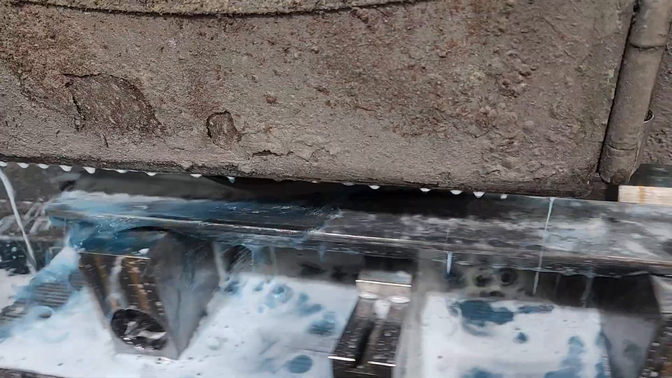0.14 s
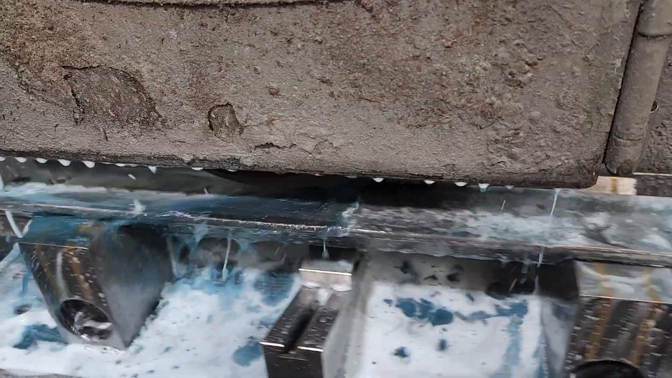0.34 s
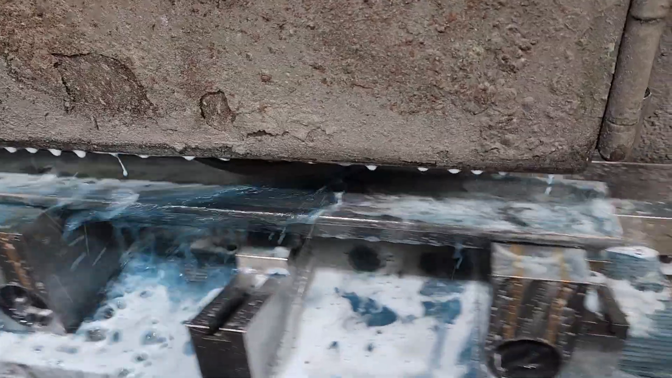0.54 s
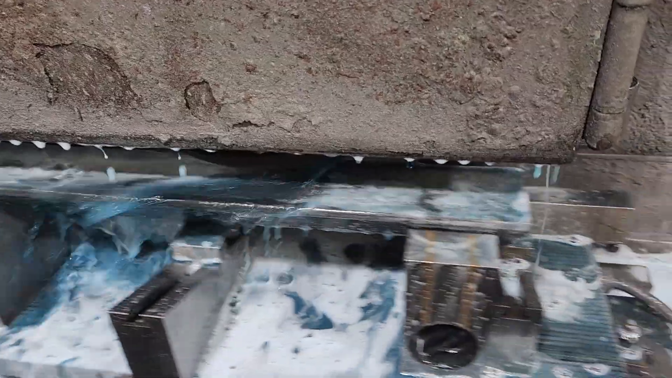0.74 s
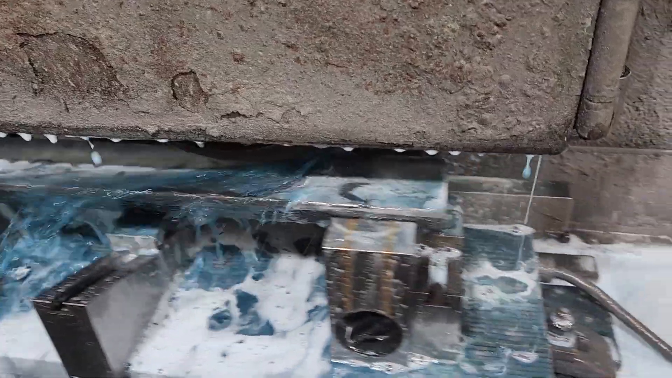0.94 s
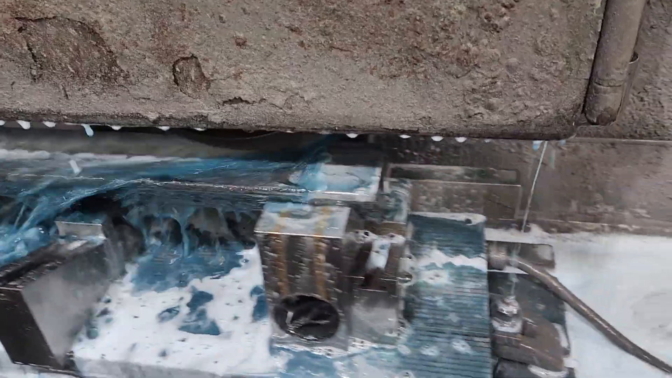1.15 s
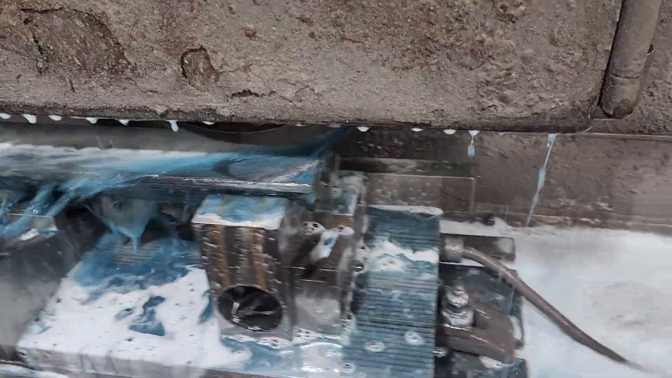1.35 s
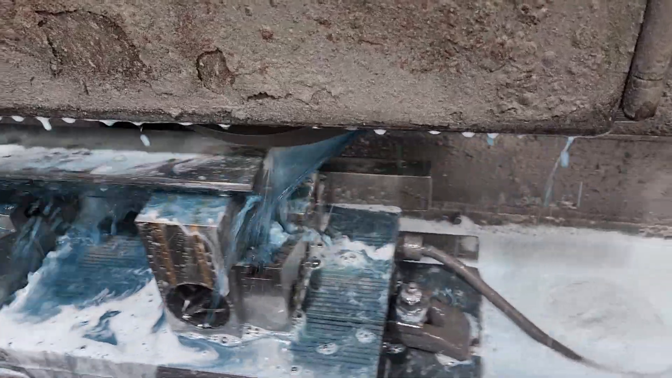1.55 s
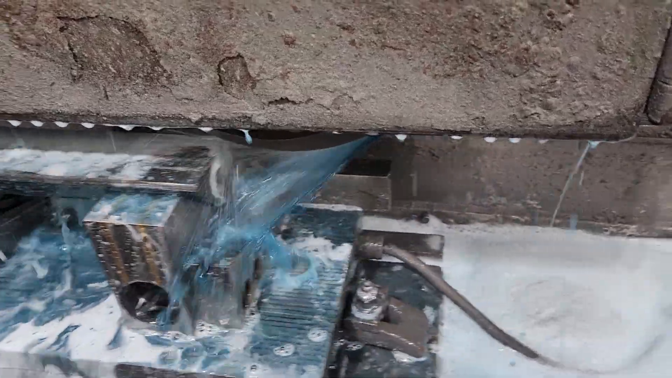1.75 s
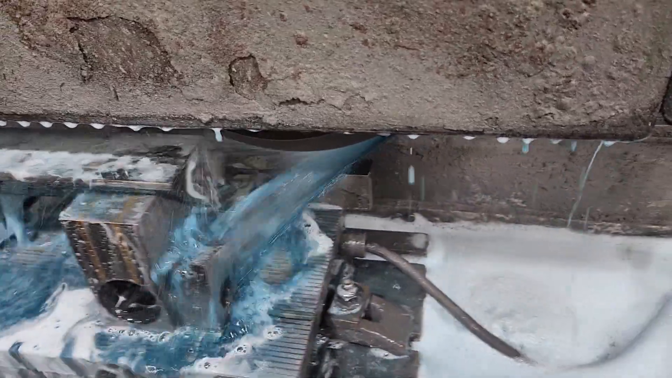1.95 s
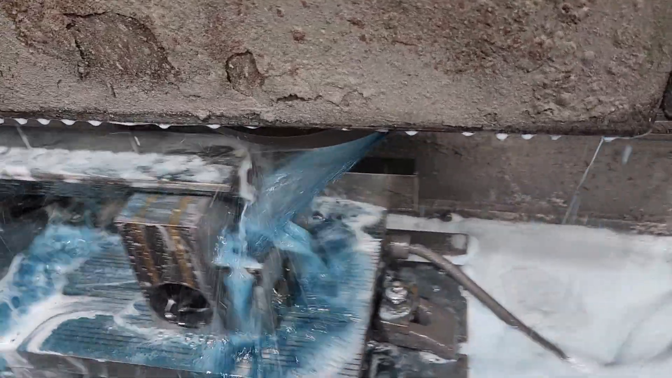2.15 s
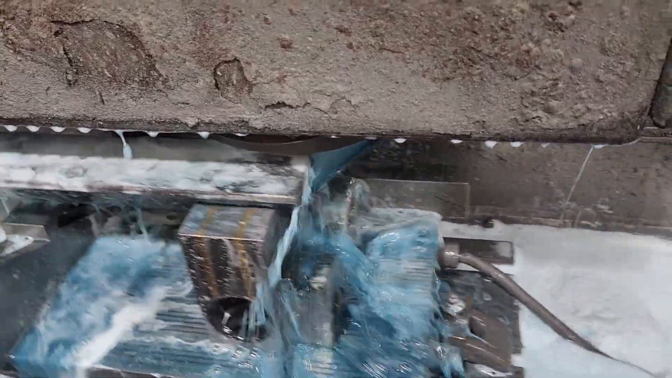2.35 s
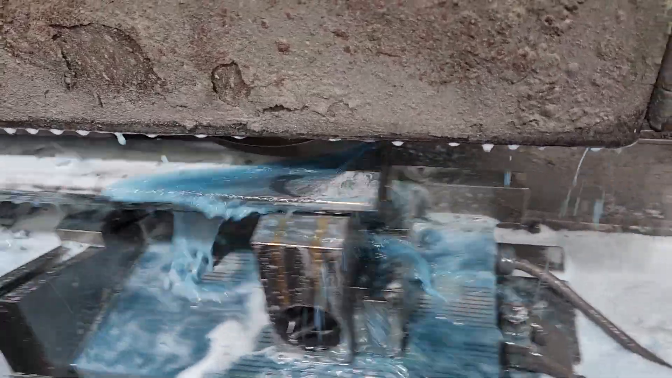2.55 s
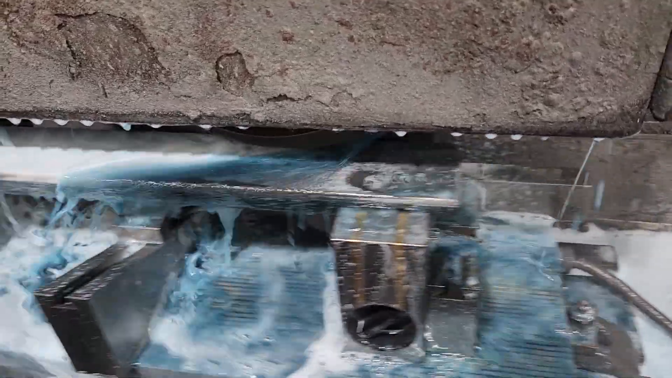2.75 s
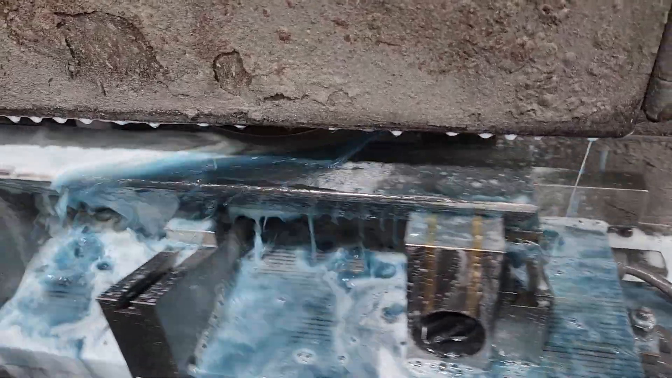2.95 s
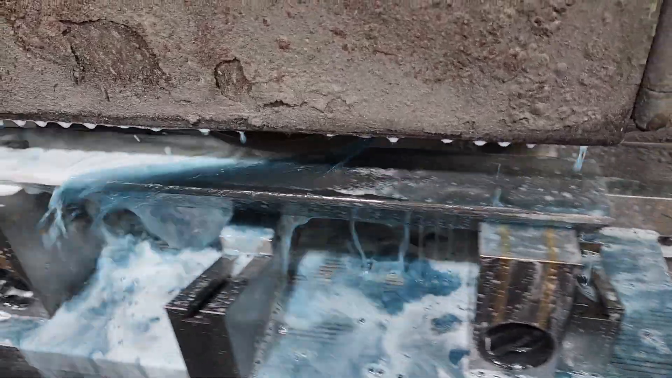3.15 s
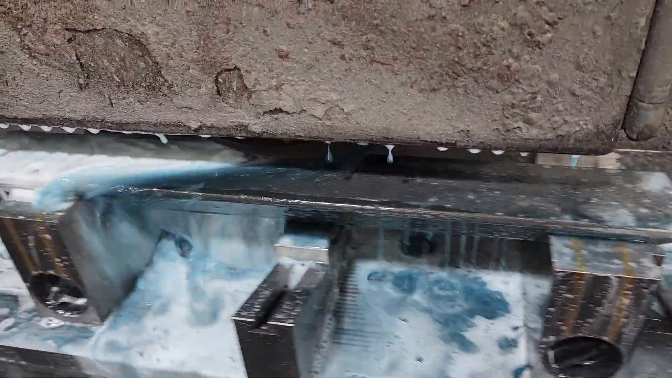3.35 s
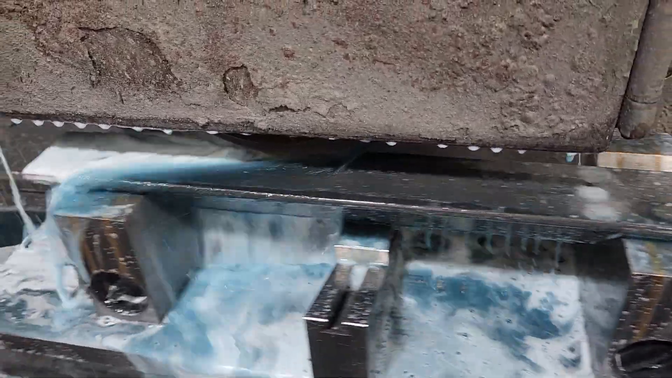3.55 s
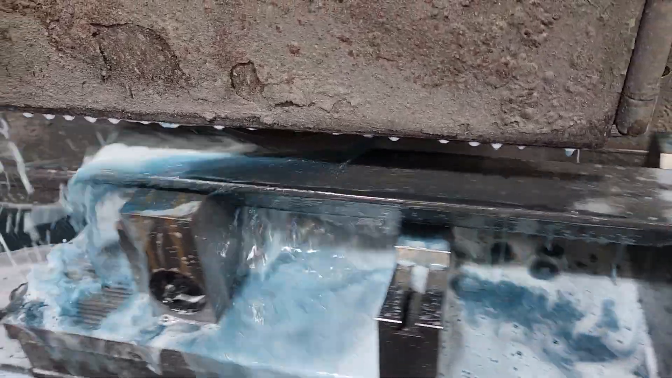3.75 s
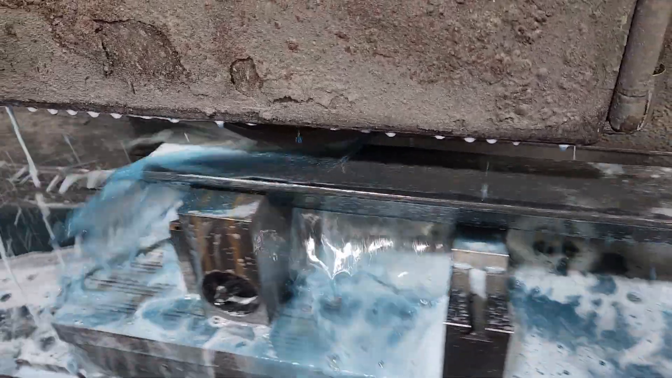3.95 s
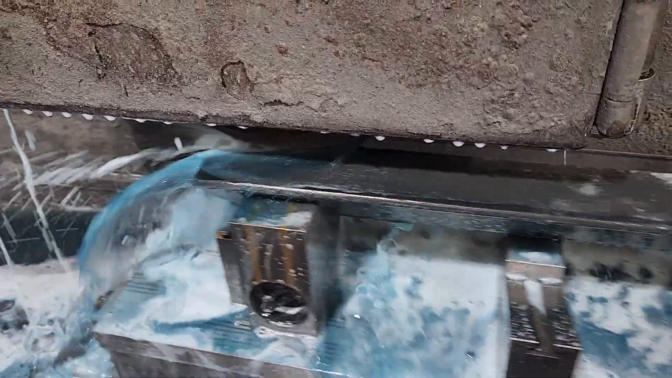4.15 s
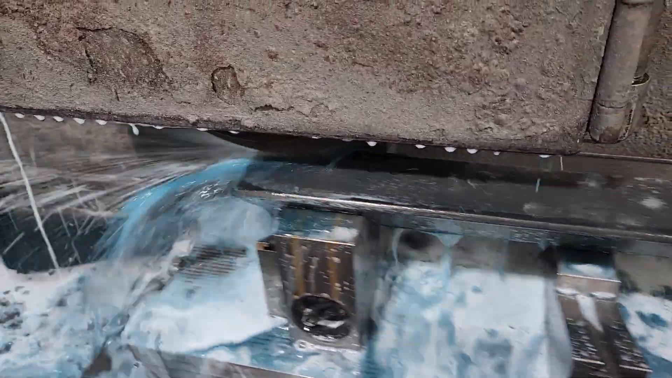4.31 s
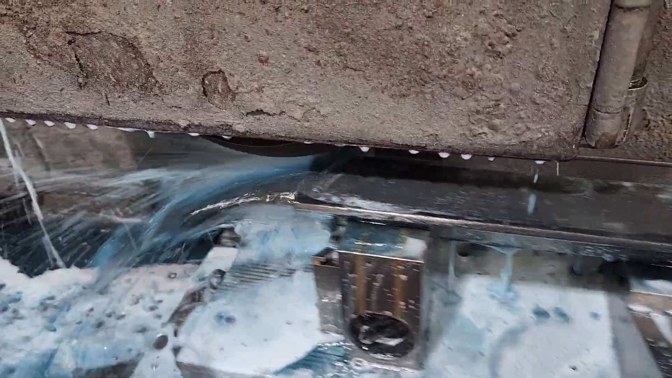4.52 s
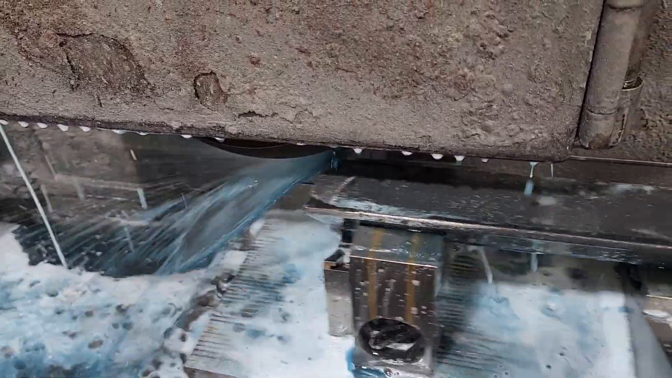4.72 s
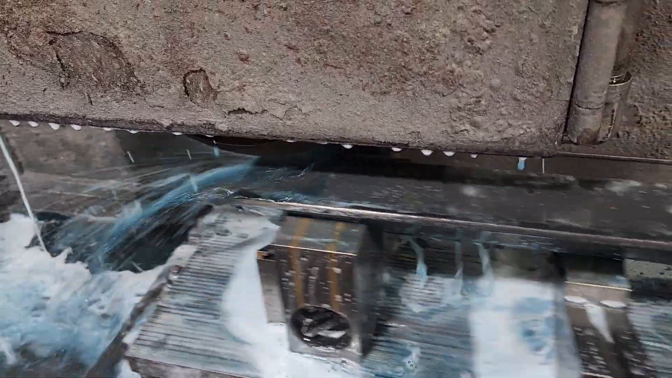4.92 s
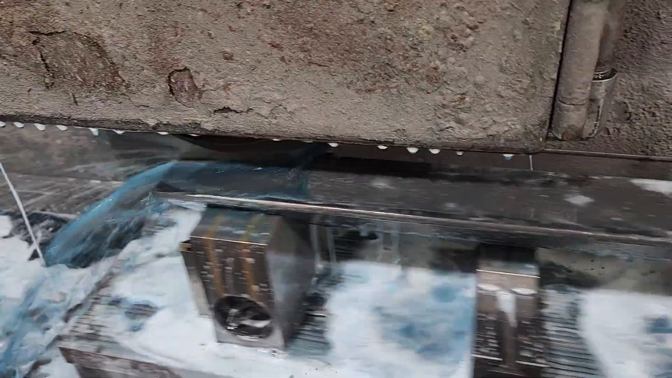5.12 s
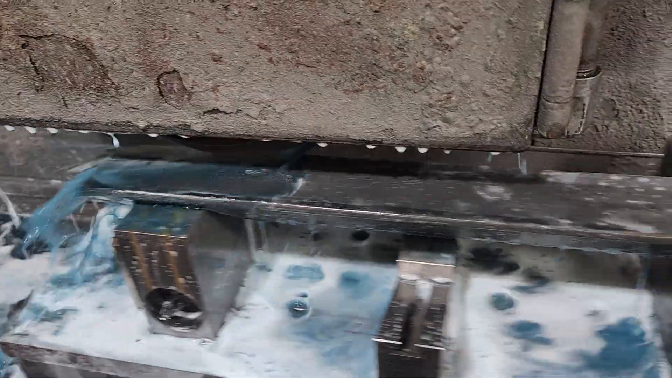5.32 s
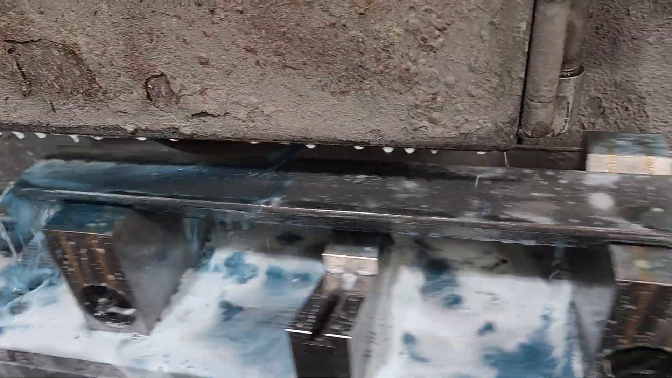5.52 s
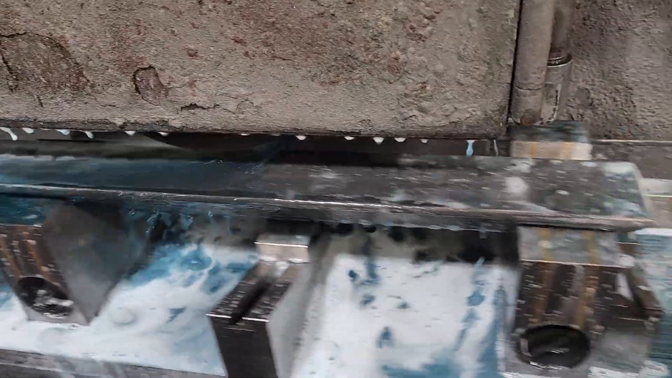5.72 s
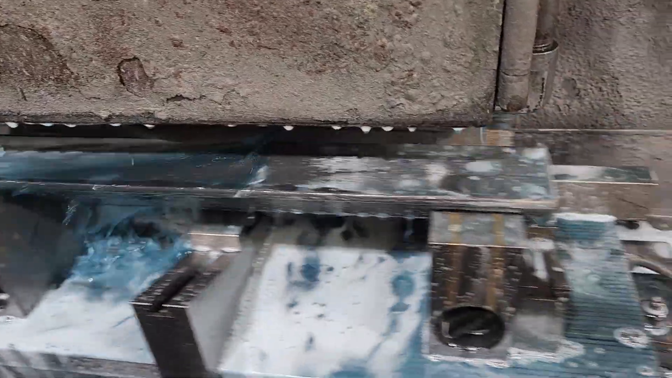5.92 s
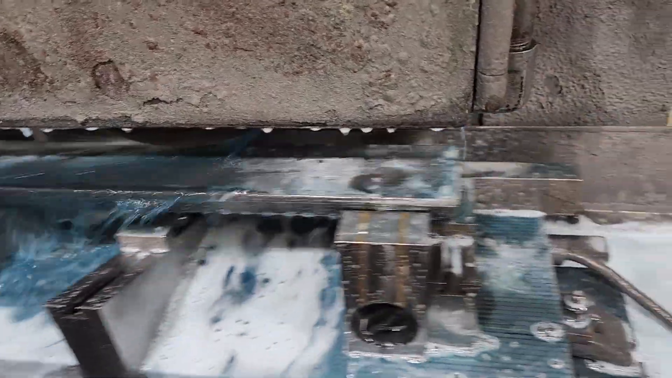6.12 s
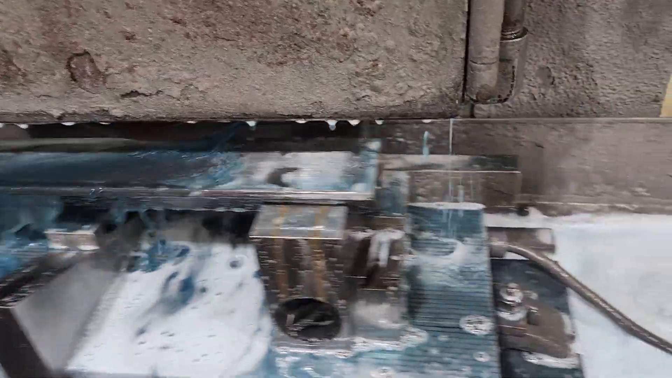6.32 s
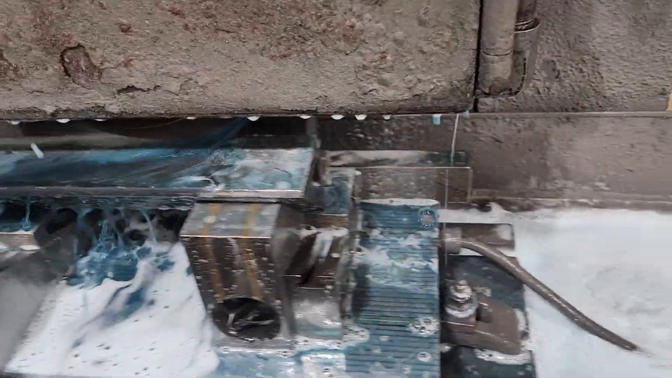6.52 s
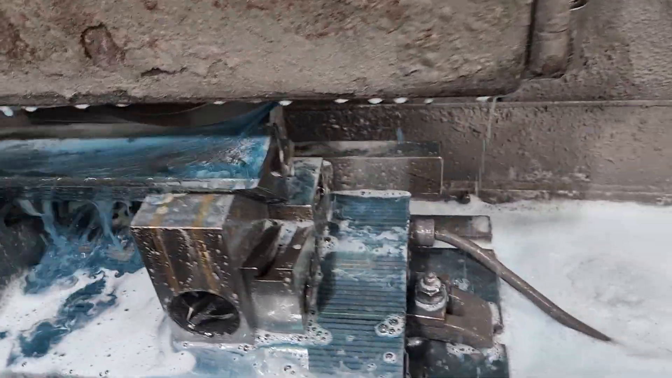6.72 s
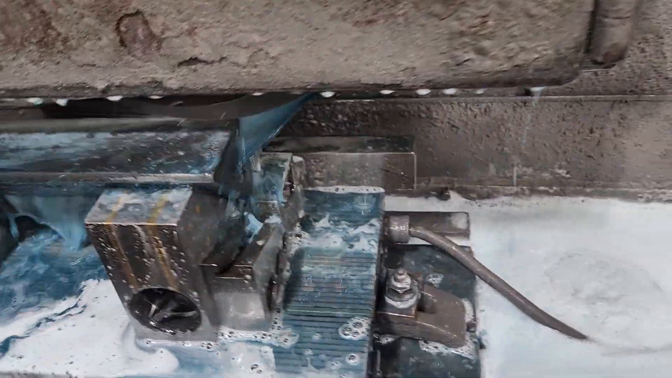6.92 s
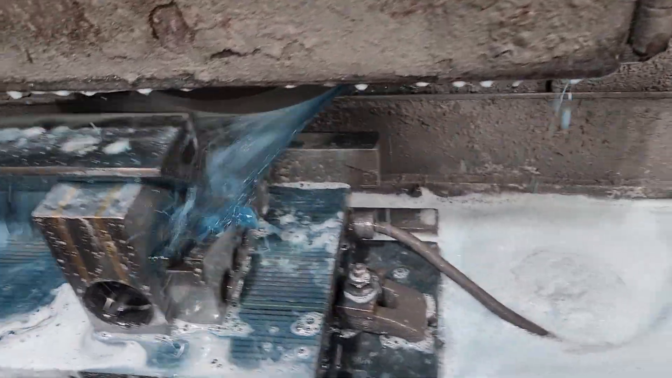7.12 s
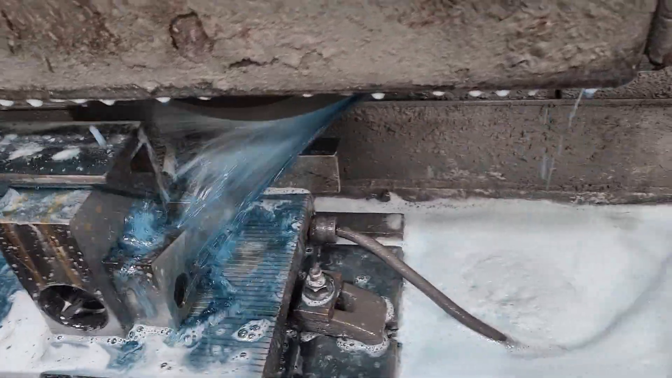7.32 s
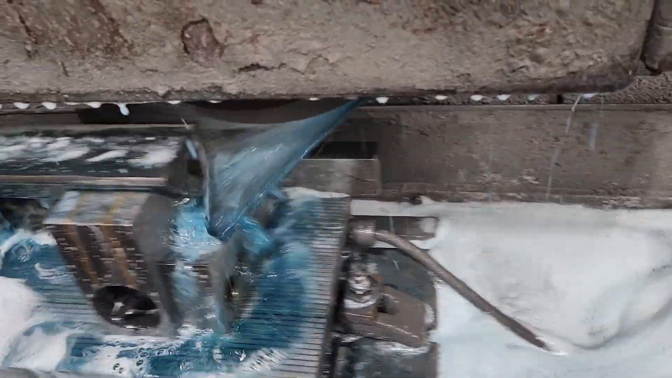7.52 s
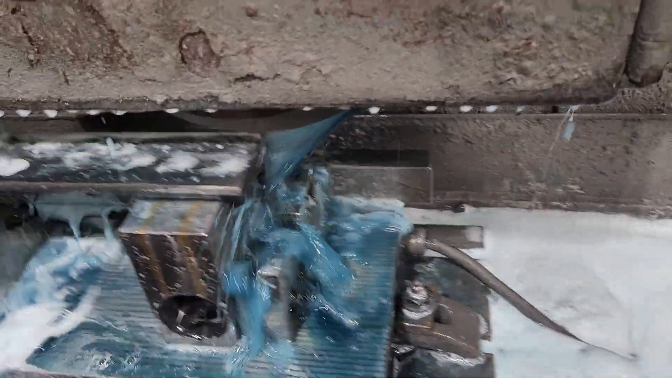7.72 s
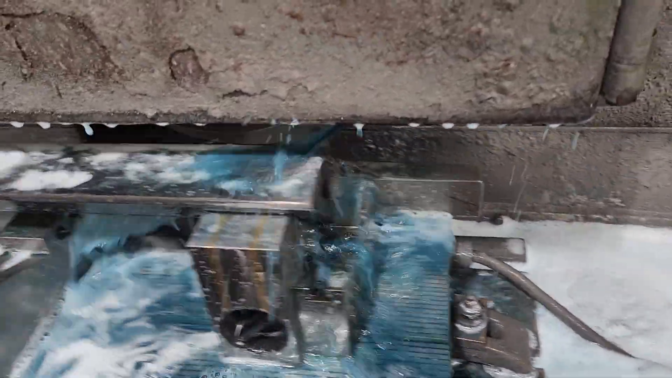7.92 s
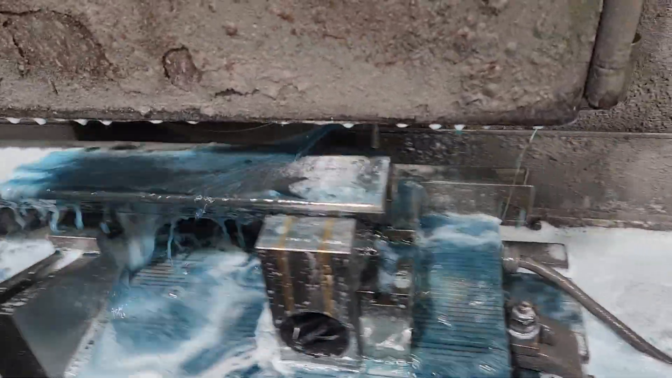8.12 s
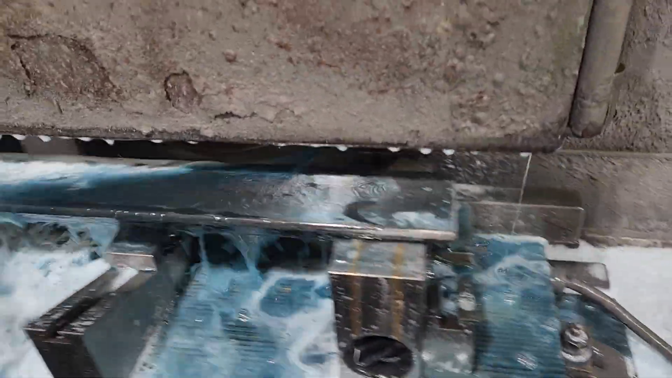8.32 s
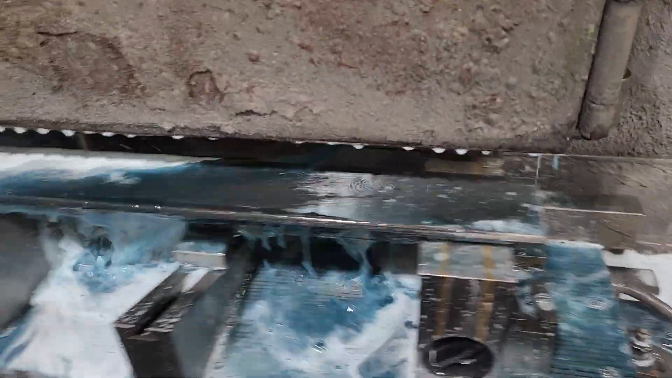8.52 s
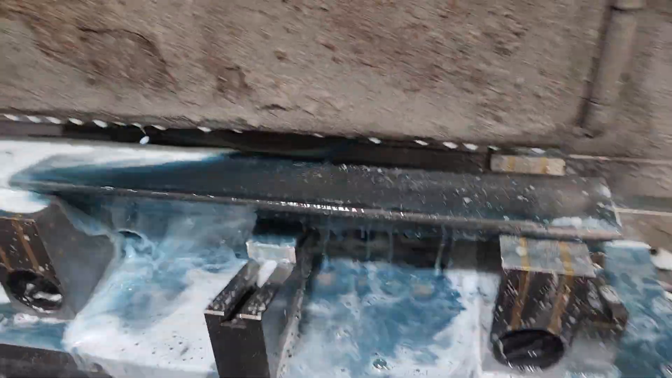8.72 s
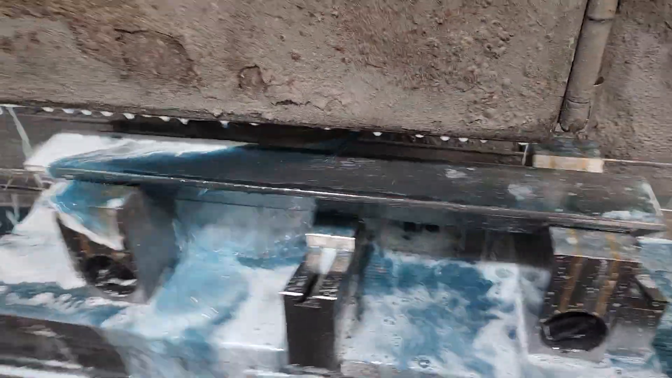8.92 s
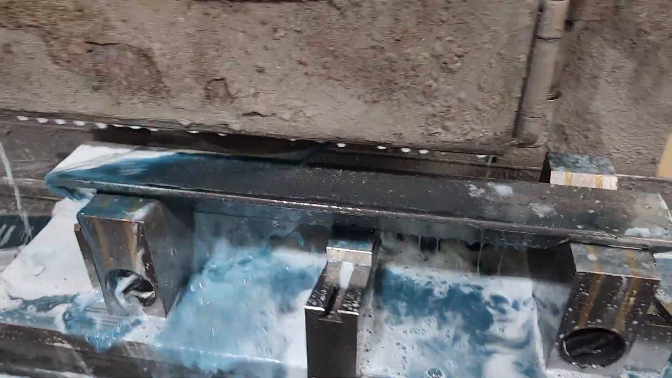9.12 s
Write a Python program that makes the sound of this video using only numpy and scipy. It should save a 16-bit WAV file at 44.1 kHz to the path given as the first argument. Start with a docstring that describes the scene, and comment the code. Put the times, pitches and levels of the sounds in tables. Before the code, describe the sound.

A surface grinder drones with a loud wavering pump whine while coolant rushes and spatters, the table knocks at its reversals and the wheel rasps briefly on steel.

```python
"""A workshop, close to a surface grinder, on two microphone ports. Motors hum and rumble at the back; the hydraulic
pump is a set of whining tones whose levels follow the table's travel. The wheel's coolant is coloured noise that
churns, rushes and spatters; the wheel twice bites the steel, repeating noise ringing through resonances.
The table drive knocks, at its reversals among other moments: clicks and rattles striking decaying modes."""
import sys
import numpy as np
from scipy import signal
from scipy.fft import rfft, irfft, next_fast_len
from scipy.io import wavfile

SR = 44100
rng = np.random.default_rng(int(sys.argv[2]) if len(sys.argv) > 2 else 0)


def file_out(sig):
    """Save sig as 16-bit WAV at sys.argv[1]."""
    # one column per channel
    cols = np.atleast_2d(sig).T
    # limit, then scale
    lim = np.clip(cols, -1, 1)
    pcm = np.round(lim * 32767).astype(np.int16)
    wavfile.write(sys.argv[1], SR, pcm)


N = 403940   # samples

WHEEL_TURNS_HZ = 29.96
# the wheel bites on the way in and again on the way out of one turn, at the same stretch of the work
BITE_TURN_S = 2.018   # middle of that turn
EDGE_S, EDGE_RISE_S = 0.33, 0.051   # travel from the turn to the edge of the work, and time to pass it
# the valve turns the table round at the near end, far end, near end: reversal_s
REVERSALS_S = [1.97, 4.72, 7.397]


def from_db(db):
    """Decibels to gain."""
    return 10 ** (np.asarray(db) / 20)


def rms_one(x):
    """Scales to unit rms."""
    return x / np.sqrt(np.mean(x ** 2) + 1e-20)


def in_time(rows):
    """Columns of a table, joined by straight lines, one value a sample."""
    s, *columns = np.transpose(rows)
    return [np.interp(np.arange(N) / SR, s, c) for c in columns]


def in_cycle(rows):
    """Repeats a table on every trip of the machine's table out and back."""
    trip_s = REVERSALS_S[2] - REVERSALS_S[0]
    return np.array([(REVERSALS_S[0] + k * trip_s + s, *rest) for k in (-1, 0, 1) for s, *rest in rows])


def on_work():
    """Travel time from the biting turn, and 0-1 for the wheel being past the edge of the work."""
    away_s = abs(np.arange(N) / SR - BITE_TURN_S)
    return away_s, np.clip((away_s - EDGE_S) / EDGE_RISE_S, 0, 1)


def at_hz(points, hz):
    """Reads a spectrum table on a log-frequency axis."""
    table_hz, values = np.array(points).T
    return np.interp(np.log(hz + 1), np.log(table_hz), values)


def drift(rate_hz):
    """Slow chance of spread 1: coarse noise twice through a one-pole low-pass."""
    coarse = 40   # samples per step
    r = np.exp(-2 * np.pi * rate_hz * coarse / SR)
    noise = rng.standard_normal(N // coarse + 2002)
    slow = signal.lfilter([1], [1, -2 * r, r * r], noise)[2000:]   # settled part
    return np.interp(np.arange(N) / coarse, np.arange(len(slow)), rms_one(slow))


def sine(turns, lead_rad=0.):
    """A tone of rms 1 in both ports, the left one ahead by lead_rad."""
    return np.sqrt(2) * np.sin(2 * np.pi * turns + np.outer([.5, -.5], lead_rad * np.ones(N)))


def per_turn(share):
    """Noise of which a share repeats on every turn of the wheel, slowly renewed; two unrelated rows."""
    size = round(SR / WHEEL_TURNS_HZ)
    fresh = rng.standard_normal((2, N // size + 21, size))
    keep = 0.916   # carried over from one turn to the next
    pattern = signal.lfilter([np.sqrt(1 - keep ** 2)], [1, -keep], fresh, axis=1)
    pattern = pattern[:, 20:].reshape(2, -1)[:, :N]
    share = np.clip(share, 0, 1)
    return np.sqrt(share) * pattern + np.sqrt(1 - share) * rng.standard_normal((2, N))


def coloured(source, spectrum, flicker_db=0., rate_hz=10.):
    """Colours two unrelated rows, mixes them to the ports, flickers half-octave bands; port mean has rms 1."""
    # left-right likeness of the noise: pitch_hz, likeness (-1 to 1)
    likeness = [(60, 0.84), (290, 1), (640, 0.13), (1410, -0.41), (3100, -0.064)]
    # how much louder the left port is: pitch_hz, difference_db
    left_louder = [(700, 4), (1290, -6), (2400, 5.5), (4400, 5.5), (8000, 0.5), (10000, 10.5),
                   (15000, 13.5)]
    size = next_fast_len(N)
    hz = np.arange(size // 2 + 1) * SR / size
    mid, side = rfft(source, size) * from_db(at_hz(spectrum, hz))
    alike = np.clip(at_hz(likeness, hz), -1, 1)
    pan = from_db(np.outer([.5, -.5], at_hz(left_louder, hz)))
    ports = pan * (np.sqrt(1 + alike) * mid + np.sqrt(1 - alike) * side * [[1], [-1]])
    ports /= np.sqrt(np.sum(pan ** 2, axis=0) + 2 * alike)
    out, half_octave = 0, 2 * np.log2(hz + 1)
    first, last = np.ceil(2 * np.log2(spectrum[0][0])), 2 * np.log2(spectrum[-1][0])
    for centre in np.arange(first, last + 1):
        band = irfft(ports * np.clip(1 - abs(half_octave - centre), 0, 1), size)[:, :N]
        out = out + from_db(flicker_db * drift(rate_hz)) * band
    return out / np.std(out.mean(axis=0))


def motors():
    """Steady lines of the spindle and the motors, wavering a little, over a low rumble."""
    # motors, before the swell: pitch_hz, level_db
    motor_lines = [(58.2, -50.5), (119.98, -32.5), (130.46, -44)]
    # wheel unbalance, before the swell: multiple of the turning rate, level_db
    spindle = [(1, -45.5), (3, -44.5), (5, -51), (6, -50.5), (8, -41.5), (9, -49.5), (7, -55.5)]
    # hum lines nearest a multiple sink for a while: multiple of the turning rate, centre_s, half_width_s, change_db
    hum_dips = [(8, 4.34, 0.67, -7.5), (4, 6.8, 0.094, -9.5)]
    # hum and rumble swell and sink together: time_s, change_db
    hum_swell = [(0, 2), (2.7, 2.5), (3.7, 4), (4.7, 3), (4.9, 0.5), (6.8, 2), (7.1, 3.5)]
    # colour of the rumble: pitch_hz, density_db (per Hz, relative)
    rumble_colour = [(25, 0), (45, -12), (100, -6.5), (230, -5.5), (400, -5.5), (600, -46)]
    t = np.arange(N) / SR
    lines = motor_lines + [(m * WHEEL_TURNS_HZ, db) for m, db in spindle]
    hum = 0
    for hz, db in lines:
        dip_db = sum(change_db * np.exp(-((t - s) / width) ** 2)
                     for m, s, width, change_db in hum_dips if round(m) == round(hz / WHEEL_TURNS_HZ))
        level = from_db(db + dip_db + 0.7 * drift(1.8))
        hum = hum + level * sine(hz * t + rng.random(), -hz / 1500)
    rumble = from_db(-41.5) * coloured(rng.standard_normal((2, N)), rumble_colour)
    return from_db(in_time(hum_swell)[0]) * (from_db([[.4], [-.4]]) * hum + rumble)


def pump():
    """Vane pressure pulses; uneven vanes make the upper tones throb once per shaft turn."""
    pump_hz, vanes = 340.2, 12
    warble_hz = 34.3   # just after a reversal a quicker, deeper throb replaces that of the shaft
    shaft_wobble = 0.0097   # uneven shaft speed, in pump cycles: side tones grow with the multiple
    # the moving table shifts the nodes of the pump tone and its octave past the ports, alike on every trip
    # both tables: since_near_turn_s, left_db, right_db
    pump_tone = [(0, -17.5, -19), (.05, -11, -11), (.12, -12, -13), (.85, -22.5, -20), (1.25, -23.5, -22.5),
                 (1.68, -30.5, -23.5), (2.34, -24.5, -22.5), (2.72, -27.5, -29.5), (2.79, -13, -11.5),
                 (2.83, -20, -20.5), (2.89, -9.5, -11.5), (3.2, -17.5, -28.5), (3.64, -17, -22),
                 (3.9, -17.5, -26.5), (4.25, -26.5, -18), (4.63, -17, -15), (5.385, -11, -12.5)]
    pump_octave = [(.067, -24, -23.5), (.19, -50, -34.5), (.7, -35.5, -38.5), (1.25, -33, -40.5),
                   (1.6, -28, -36), (2.0, -32.5, -31.5), (2.5, -34.5, -44), (2.85, -35, -31),
                   (3.3, -41, -34.5), (3.8, -61, -39), (4.3, -33, -41.5), (4.7, -35, -36), (5.39, -39, -42)]
    # phase by which the left port leads, both tables: since_near_turn_s, lead_rad
    tone_lead = [(0, -.45), (1.15, -.4), (1.65, .7), (2.0, .3), (2.6, .1), (2.8, -.45), (3.13, -.45),
                 (3.22, .9), (3.65, .9), (4.0, 3.3), (4.3, 5.2), (4.7, 5.75)]
    octave_lead = [(.05, 1.3), (.2, 4.2), (.7, 3.2), (1.55, .4), (2.0, 1.1), (2.4, 1.0), (2.65, -.5),
                   (2.85, 1.5), (3.3, 2.2), (3.6, .3), (4.2, -1.8), (4.65, 0), (5.1, .9)]
    # unrepeated swells and dips of the two: multiple, centre_s, half_width_s, left_db, right_db, left_lead_rad
    one_off = [(1, 0.55, 0.034, -15, -28, 0.15), (1, 0.37, 0.17, -2, 7, -1),
               (1, 0.53, 0.45, 5.5, -7, -0.48), (2, 0.48, 0.58, 8.5, 5.5, 0.77),
               (2, 1.1, 0.39, -11.5, -2.5, 0.084), (2, 7.85, 0.39, -13, 0.5, -1)]
    # since_near_turn_s, third_multiple_db, fourth_db, fifth_db
    overtones = [(.05, -45.5, -51, -53), (.45, -44, -52, -49.5), (.9, -49, -47, -55), (1.3, -40, -41, -49),
                 (1.65, -45.5, -45, -45), (2.24, -42.5, -47, -41), (2.95, -45.5, -53, -52),
                 (3.4, -40, -47.5, -45.5), (3.95, -47.5, -43.5, -53), (4.6, -51, -46.5, -49.5),
                 (5.05, -53.5, -47, -49.5)]
    # faint whine: multiple of the pump tone, level_db
    whine = [(6, -59), (7, -57), (8, -57.5), (9, -55.5), (10, -59.5), (11, -57.5), (12, -57), (13, -58),
             (14, -58)]
    # pump shaft tones between the overtones: multiple of its turning rate, level_db
    shaft_lines = [(34, -51), (35, -55), (47, -51)]
    # single overtones swell into whistles and fade again: multiple, centre_s, half_width_s, lift_db
    whistles = [(6, 0.35, .3, 9), (6, 3.4, .7, 5), (6, 8.5, 0.53, 10.5), (9, 1.5, 0.43, 9.5),
                (9, 7.8, 0.21, 10), (10, 0.92, 0.82, 12), (10, 3.34, 1.5, 12.5), (10, 6.97, 0.79, 9),
                (10, 8.6, 0.53, 12.5), (12, 0.94, 1.2, 9), (12, 3.6, 0.75, 8.5), (12, 5.4, 0.29, 8.5),
                (12, 8.6, 0.56, 9)]
    t = np.arange(N) / SR

    def hump(s, width):
        """A bell in time around s."""
        return np.exp(-((t - s) / width) ** 2)

    # around each reversal the two lowest tones waver in pitch, up and then down
    waver_hz = sum(4 * hump(s, 0.027) - 6 * hump(s + 0.069, 0.0382) for s in REVERSALS_S)
    turns, wavering = pump_hz * t, np.cumsum(pump_hz + waver_hz) / SR
    shaft_turns = turns / vanes
    warble = sum(hump(s + 0.06, 0.062) * np.cos(2 * np.pi * warble_hz * (t - s - 0.054)) for s in REVERSALS_S)
    throb_left = 1 - sum(hump(s + 0.06, 0.049) for s in REVERSALS_S)
    throb = np.cos(2 * np.pi * shaft_turns) * throb_left + 2.5 * warble
    out = 0
    lowest = [(pump_tone, tone_lead, .03), (pump_octave, octave_lead, .25)]   # last: throb depth
    for multiple, (rows, leads, depth) in enumerate(lowest, start=1):
        s, lead = in_cycle(leads).T
        *odd_db, odd_lead = sum(np.outer(change, hump(at, width))
                                for m, at, width, *change in one_off if round(m) == multiple)
        db = np.add(in_time(in_cycle(rows)), odd_db)
        lead = np.interp(t, s, np.unwrap(lead)) + odd_lead
        out = out + from_db(db) * (1 + depth * throb) * sine(multiple * wavering, lead)
    upper = list(zip([3, 4, 5], in_time(in_cycle(overtones))))
    upper += [(m, db + drift(0.83)) for m, db in whine]
    upper += [(round(m) / vanes, db + drift(1.0)) for m, db in shaft_lines]
    wobbly = turns + shaft_wobble * np.sin(2 * np.pi * shaft_turns)
    for multiple, db in upper:
        db = db + sum(lift_db * hump(s, width)
                      for m, s, width, lift_db in whistles if round(m) == round(multiple))
        pan = from_db(np.outer([.5, -.5], 2.0 + 4 * drift(0.53)))
        lead = 1.26 + 0.42 * drift(0.23)
        # levels hold for the mean of the ports, unless the two nearly cancel
        pan /= np.maximum(abs(pan[0] * np.exp(1j * lead) + pan[1]) / 2, .5)
        depth = 0.24 + 0.16 * drift(3.4)
        ragged = 1 + depth * np.cos(2 * np.pi * (shaft_turns + rng.random())) + 0.2 * drift(6.1)
        out = out + from_db(db) * pan * ragged * sine(multiple * wobbly + rng.random(), lead)
    return out


def coolant():
    """The wheel churns the flood in its guard; the jet rushes over the work and throws drops that land in bursts."""
    # levels before the lift over the work: since_near_turn_s, churn_db, rush_db, spatter_db
    flood = [(.05, -38.5, -43, -32.5), (.4, -39.5, -42, -33), (1.4, -37, -40.5, -31.5),
             (2.16, -36.5, -40, -31), (2.6, -35.5, -36.5, -28.5), (2.72, -33, -37, -27.5),
             (2.76, -33.5, -43.5, -30.5), (3.03, -40, -45, -31.5), (4.4, -38, -40.5, -33.5),
             (5.15, -38, -43.5, -33.5)]
    # colours, all three: pitch_hz, density_db (per Hz, relative)
    churn_colour = [(250, 4), (400, 1), (550, 3), (750, 5.5), (1000, 2.5), (1350, 2), (1600, -3),
                    (2100, -2), (2600, -13)]
    rush_colour = [(1500, 1), (2200, -4.5), (2700, 0.5), (3500, 2), (4800, 1), (7500, -4.5), (8800, -8)]
    spatter_colour = [(3500, -24), (5200, -1), (6900, 0.5), (7200, 3), (7700, 4), (8300, -1.5), (8700, -6),
                      (11000, -4.5), (11500, -1), (14000, 1.5), (15800, 3)]
    # lift over the work, one value each for churn, rush and spatter: lift_db
    loaded_db = [1.5, 2.5, 2]
    loaded_s = 3.1   # travel from the biting turn by which the lift is gone
    away_s, over = on_work()
    loaded = over * np.clip((loaded_s - away_s) / (loaded_s / 2), 0, 1)
    churn_db, rush_db, spatter_db = in_time(in_cycle(flood)) + np.outer(loaded_db, loaded)
    bursts = from_db(drift(6.5) + 0.67 * drift(29) + 1.25 * drift(270))
    churn = from_db(churn_db) * coloured(per_turn(0.28), churn_colour, flicker_db=2.37, rate_hz=2.7)
    rush = coloured(per_turn(0.25), rush_colour, flicker_db=1.6, rate_hz=7.6)
    rush = from_db(rush_db + 1.6 * drift(53)) * rush
    drops = coloured(rng.standard_normal((2, N)), spatter_colour, flicker_db=1.6, rate_hz=16.0)
    return churn + rush + from_db(spatter_db) * bursts * drops


def knocks():
    """Each knock is a click with a short dull rattle; it strikes every mode of the table, unevenly at each port."""
    # knocks in the table drive: start_s, strength_db, favoured_hz
    blows = [(0.331, -32, 460), (1.795, -32, 900), (1.935, -28, 1150), (4.718, -10, 870),
             (4.7365, -22, 520), (7.218, -24, 880), (7.363, -28, 1700), (7.382, -24, 1100)]
    # modes of the table casting: pitch_hz, level_db, t60_s
    casting = [(280, 1, 0.14), (302, 9.5, 0.25), (399, 2, 0.15), (470, -3, 0.18), (532, 11.5, 0.031),
               (716, -19, 0.13), (897, -6, 0.093), (976, -16, 0.32), (1100, -16, 0.063), (1150, 5.5, 0.012),
               (1320, -12, 0.084), (1720, -3.5, 0.028), (2045, 1.5, 0.043), (2380, 5, 0.016)]
    # low bumps: start_s, pitch_hz, peak_db, fade_s
    bumps = [(1.93, 132.4, -31, 0.056), (2.42, 50, -36, 0.034), (7.341, 133, -26, 0.048)]
    favour_per_db = 0.2   # the softer a blow, the more sharply it picks the modes near its own pitch
    rise_cycles = .6   # each mode takes this long to build up, so the lows come late
    out, size = np.zeros((2, N)), SR // 2
    t = np.arange(size) / SR
    uneven_db = rng.normal(0, 0.67, (len(blows), len(casting), 2))
    rattles = rng.standard_normal((len(blows), 2, size))
    for (s, strength_db, favoured_hz), spread, rattle in zip(blows, uneven_db, rattles):
        ring = 0
        for (hz, db, t60), port_db in zip(casting, spread):
            envelope = (1 - np.exp(-t * hz / rise_cycles)) * from_db(-60 * t / t60)
            mode = np.outer(from_db(db + port_db), envelope * np.sin(2 * np.pi * hz * t))
            mistuned = hz / favoured_hz + favoured_hz / hz - 1   # 1 at the favoured pitch
            ring = ring + mode / mistuned ** (-strength_db * favour_per_db)
        dull_rattle = signal.lfilter([1], [1, -.9], rattle) * np.exp(-t / 0.059)
        blow = (t == 0) + 0.0036 * dull_rattle
        at = round(s * SR)
        out[:, at:at + size] += from_db(strength_db) * signal.fftconvolve(ring, blow, axes=1)[:, :size]
    for s, hz, peak_db, fade_s in bumps:
        fades = np.clip(np.arange(N) / SR - s, 0, None) / fade_s   # time since the start, in fade times
        out += from_db(peak_db) * fades * np.exp(1 - fades) * np.sin(2 * np.pi * hz * fade_s * fades)
    return out


def cut():
    """Mostly the same grits strike on every turn and ring the resonances of the work."""
    # wheel touching steel: travel_from_turn_s, level_db
    touch = [(.4, -44.5), (.75, -35.5), (1.0, -43.5), (1.15, -71), (1.5, -66)]
    # resonances of the work: pitch_hz, width_hz, level_db,
    # farther_s (travel by which the loudest point lies farther from the turn)
    work = [(1930, 25, -8, -.05), (2105, 120, 0.5, -0.031), (5460, 290, -4, .03), (6430, 400, 1.5, 0.043),
            (7400, 320, -2, 0.097)]
    grits, out = per_turn(0.83), 0
    away_s, over = on_work()
    for hz, width_hz, db, farther_s in work:
        r = np.exp(-np.pi * width_hz / SR)
        ring = signal.lfilter([1, 0, -1], [1, -2 * r * np.cos(2 * np.pi * hz / SR), r * r], grits)
        touch_db = np.interp(away_s - farther_s, *np.transpose(touch))
        out = out + from_db(db + touch_db) * rms_one(ring)
    return over * from_db([[2.5], [-1.5]]) * out   # louder at the left port


def scene():
    """All sources at the two ports."""
    return motors() + pump() + coolant() + knocks() + cut()


def record(dry):
    """A steep low-pass cuts the top."""
    cutoff_hz = 15740
    return signal.sosfilt(signal.ellip(14, .5, 60, cutoff_hz, fs=SR, output="sos"), dry)


dry = scene()
out = record(dry)
file_out(out)
```